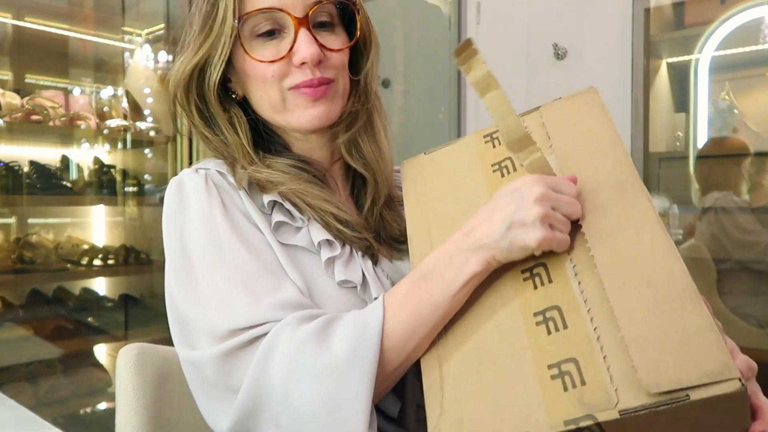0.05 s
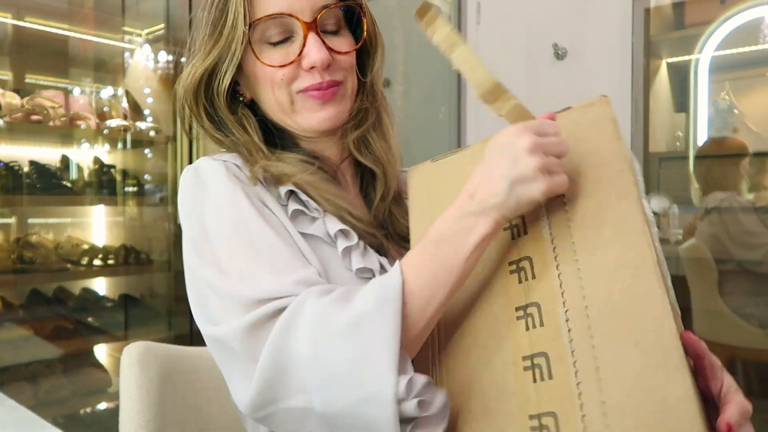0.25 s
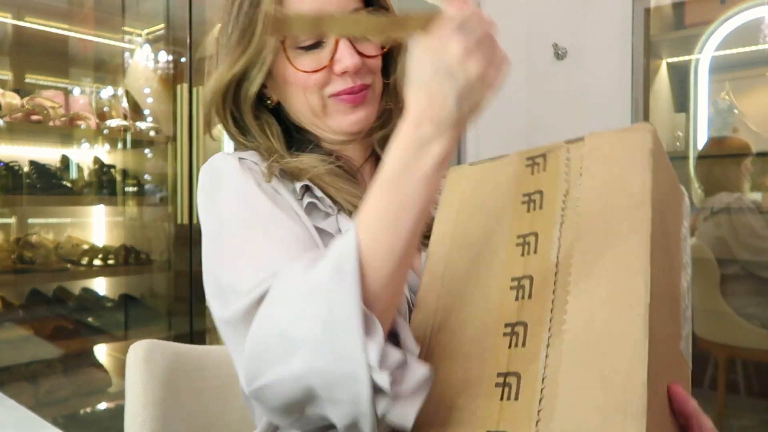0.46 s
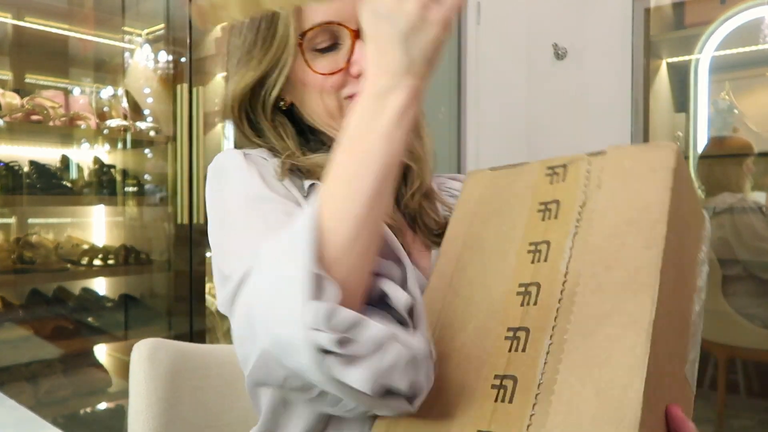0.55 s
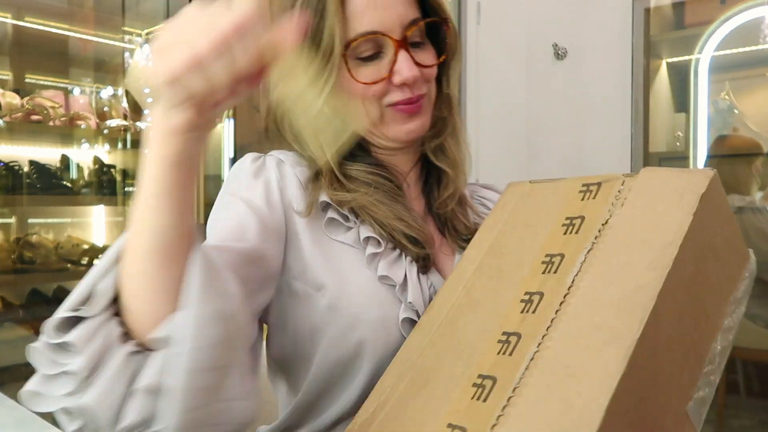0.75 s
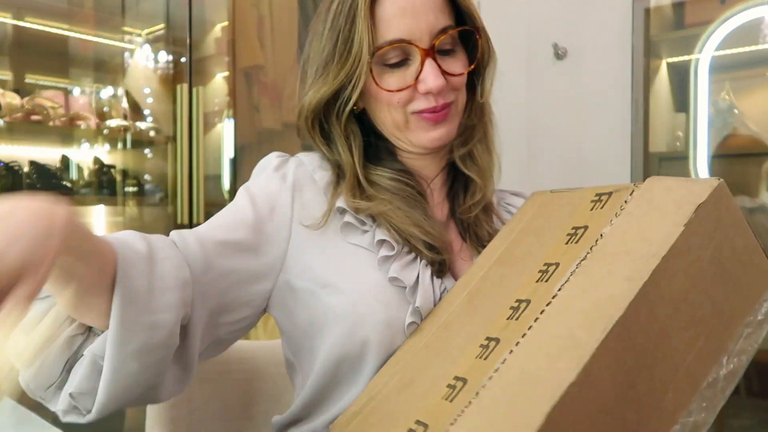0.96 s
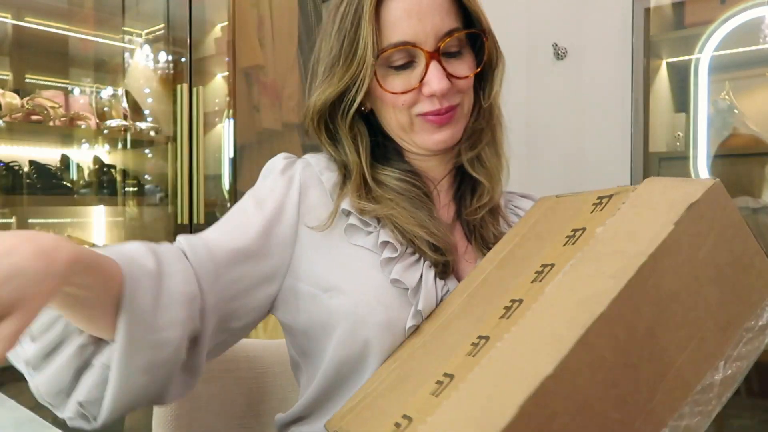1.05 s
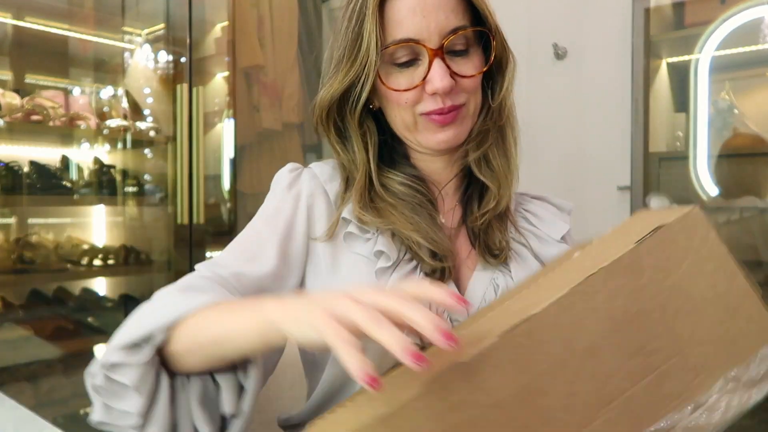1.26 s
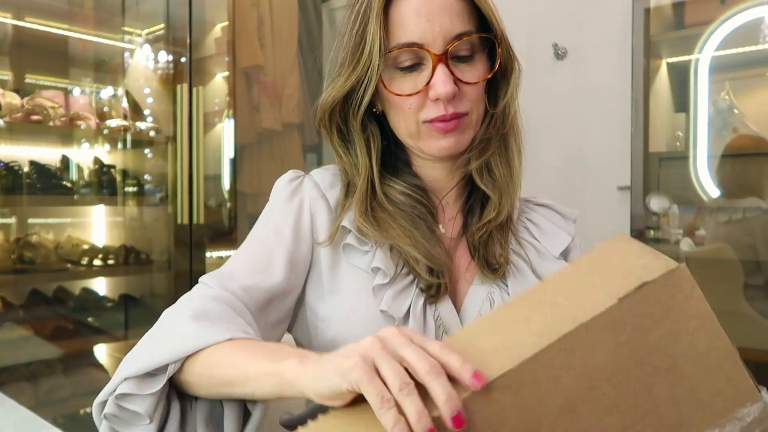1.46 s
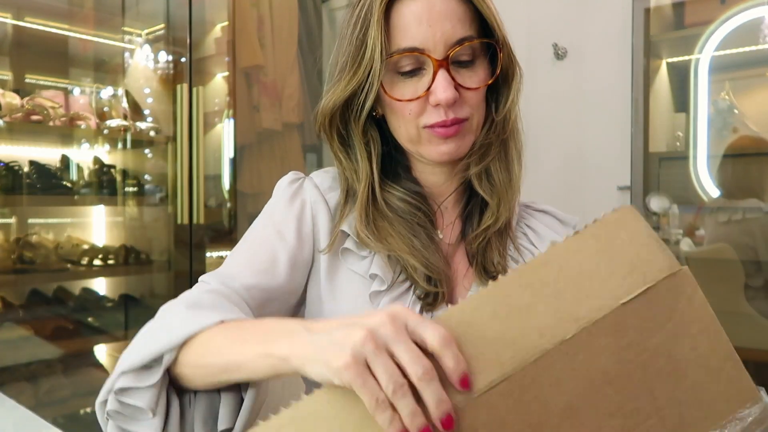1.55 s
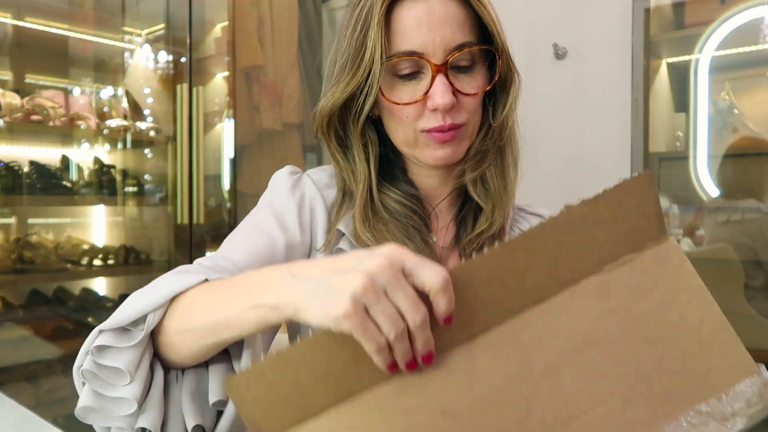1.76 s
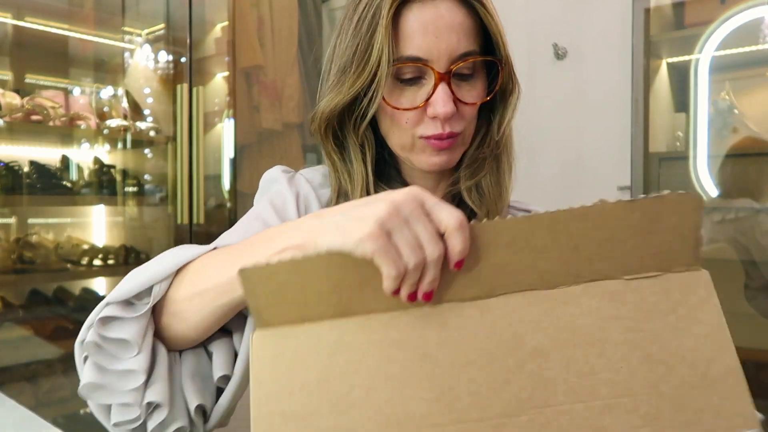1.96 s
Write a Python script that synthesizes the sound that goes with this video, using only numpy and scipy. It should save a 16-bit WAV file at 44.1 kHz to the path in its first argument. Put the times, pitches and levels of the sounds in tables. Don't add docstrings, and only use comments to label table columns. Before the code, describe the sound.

Cardboard tearing, close to a small stereo microphone indoors: a sudden harsh rip in two bursts with hollow box resonance, quick fade, then finger taps, a knock and light creaking pops as the flap is prised up.

```python
import sys
import numpy as np
from scipy import signal
from scipy.fft import rfft, irfft, next_fast_len
from scipy.io import wavfile
from scipy.ndimage import uniform_filter1d

SR = 44100
rng = np.random.default_rng(int(sys.argv[2]) if len(sys.argv) > 2 else 0)


def waveform_to_disk(signal):
    frames = np.transpose(np.atleast_2d(signal))
    scaled = np.clip(frames, -1, 1) * 32767
    samples = np.round(scaled).astype(np.int16)
    wavfile.write(sys.argv[1], SR, samples)


def convert_level_to_amplitude(level_db):
    exponent = np.asarray(level_db, float) / 20
    return 10 ** exponent


N = 88200

# time in seconds, force in dB, box drive in dB, brightness in dB per octave.
STRIP_PULL = [
    [(0, -49.5, 1.5, 3.5), (.143, -62.5, -8, 9), (.150, -55, 5, 8), (.195, -54, 4, 8.5),
     (.224, -38.5, -2, 6), (.2365, -35, -8, 4)],
    [(.2385, -21, 0, 2), (.25, -22.5, -5.5, 6.5), (.275, -22.5, -3.5, 4.5), (.315, -26.5, 2, 2.5),
     (.37, -35, -4, 1.5), (.395, -25, -6, -2.5), (.42, -30, -2, 1)],
    [(.432, -21, -1.5, -4.5), (.451, -33, 0, 0.5), (.482, -28.5, 1.5, 0.5), (.53, -37, -5, -13.5),
     (.6, -53, -5, -16), (.76, -58.5, -16, 4.5)],
]
# time in seconds, force in dB, box drive in dB, brightness in dB per octave.
LID_PULL = [
    [(1.06, -64, -5, 4), (1.095, -51, -5, -1.5), (1.13, -53.5, -3, 2.5), (1.161, -53, 0, 0),
     (1.166, -37, -6, 3), (1.21, -40.5, -4.5, 3.5), (1.266, -46, -2.5, 2.5), (1.34, -42, -10, 4.5),
     (1.395, -36, -7, 3.5)],
    [(1.45, -39, 0.5, 0.5), (1.522, -43, -0.5, 4), (1.579, -40, 0, 1), (1.584, -33, -2, -2),
     (1.635, -33.5, -8, -3.5), (1.682, -36, -3, 4.5)],
    [(1.693, -29, -1, -3), (1.72, -29.5, -8, 2), (1.745, -37, -12, 0), (1.81, -42.5, -4.5, 3.5),
     (1.835, -38, 2.5, -3), (1.88, -41, -1, 6.5), (1.95, -36.5, -1.5, 1.5), (2.0, -33.5, -5, 0)],
]
# time in seconds, peak level in dB, length in seconds, low pitch
# in Hz (also the slips per second, up to a limit), level of the crisp part in dB.
GLUE_SNAPS = [(.2378, -9, .002, 450, -4), (.4228, -5, .0055, 590, -14), (1.1622, -21, .004, 1750, 2),
              (.151, -36, .008, 1300, 0), (.2665, -9, .004, 1000, -2), (.278, -12, .003, 600, -3),
              (.483, -17, .004, 1100, 0), (1.178, -25, .004, 380, -10), (1.445, -25, .005, 800, -12),
              (1.582, -21, .012, 540, -6), (1.831, -28, .008, 380, -14), (1.689, -30, .009, 1600, 0),
              (1.703, -21, .002, 900, 0), (1.96, -26, .008, 300, -14)]
# time in seconds, peak level in dB, length in
# seconds, pitch in Hz, width in Hz.
SHORT_BURSTS = [(.2478, -10, .006, 2850, 600), (.2545, -8, .005, 3000, 350), (.2615, -9, .005, 3200, 450),
                (.2675, -9, .0025, 3000, 450), (.2712, -9, .003, 3000, 450), (.2775, -12, .007, 3050, 350),
                (.287, -15, .005, 3050, 400), (.3075, -12, .008, 2950, 500), (.4218, -9, .0025, 2800, 500),
                (.4228, -9, .005, 1250, 250), (.4228, -11, .004, 1850, 300), (.4265, -12, .0025, 3050, 600),
                (.4245, -16, .003, 3900, 900), (.46, -22, .008, 2800, 900), (1.1622, -22, .005, 2050, 500),
                (1.1775, -26, .007, 380, 200), (1.188, -29, .006, 330, 200), (1.636, -26, .005, 2100, 900),
                (1.685, -19, .01, 1600, 500), (1.6865, -19, .013, 3200, 800), (1.693, -17, .005, 2600, 800),
                (1.715, -22, .007, 2800, 1200), (.2405, -11, .005, 300, 200), (.296, -17, .008, 3050, 400),
                (1.698, -21, .006, 3400, 1200), (1.209, -30, .005, 2200, 500), (1.17, -29, .014, 3200, 700),
                (1.19, -30, .011, 3100, 800), (1.172, -30, .012, 2000, 400), (1.705, -23, .012, 3300, 1200),
                (.43, -20, .02, 200, 80)]
# start in seconds, length in seconds, level in dB.
FIBRE_FIZZ = [(.55, 0.71, -76.5), (1.5, .13, -67), (0.141, 0.1, -60.5), (.232, .035, -41),
              (1.645, 0.06, -63.5), (1.675, 0.051, -51.5)]
# time in seconds, level in dB, tilt in dB per octave, ring time factor.
BOX_BLOWS = [(.2375, -15, -3, .9), (1.4015, -16.5, 4, .6), (1.4112, -20, 4, .9), (.262, -22, -3, 1.1),
             (.425, -25, 4, .9), (1.945, -34, 3, .6)]
# start in seconds, rubbing time in seconds, pitch in Hz,
# level in dB, time to die by 60 dB in seconds.
RUBBED_PANELS = [(.255, 0.058, 592, -22.5, 0.2), (.24, 0.085, 1030, -26, 0.058),
                 (.28, 0.052, 1482, -25, 0.081), (.244, 0.071, 2940, -27, 0.0089),
                 (.264, .012, 1850, -19, 0.027), (.43, 0.05, 600, -34, .06),
                 (.475, 0.093, 1010, -28.5, .035), (.466, 0.035, 1065, -28, 0.057),
                 (.635, 0.039, 1025, -47, 0.046), (.715, 0.059, 1010, -53, .04),
                 (.47, 0.04, 1240, -35.5, 0.22), (.46, 0.15, 186, -35, 0.084),
                 (0.0077, 0.15, 96, -41, 0.093), (1.455, .055, 195, -29, 0.08),
                 (1.62, 0.068, 644, -34, 0.016), (.56, 0.082, 680, -46, .08), (.5, 0.047, 702, -38, 0.083),
                 (0.18, 0.076, 630, -57.5, .06)]
# pitch in Hz, level in dB, time to die by 60 dB in seconds.
BOX_MODES = [(88, -4, .28), (128, -1, .25), (186, -1, .3), (222, -4, .1), (300, -11, .08)]
# frequency in Hz, level in dB per Hz.
CARD_COLOUR = [(120, -23), (200, -17), (544, -18.5), (596, -7.5), (906, -7.5), (992, -9.5), (2900, -11.5),
               (3360, -15), (15500, -42.5)]
# pitch in Hz, width in Hz, level in dB.
CARD_PANELS = [(654, 240, -0.5), (1050, 63, -9), (1480, 260, -7), (1860, 1000, 0.5), (2950, 1100, -4.5),
               (4390, 540, -5)]
# frequency in Hz, level in dB per Hz.
HUM_COLOUR = [(15, -41), (25, -8.5), (140, 2.5), (305, -16), (349, -12), (421, -19.5), (482, -18),
              (10400, -40.5), (15500, -57)]
# frequency in Hz, level in dB per Hz.
HISS_COLOUR = [(35, -45), (60, -20), (156, -0.5), (285, 7), (320, 2), (359, 5), (829, -1), (15500, -22)]
# frequency in Hz, time to die by 60 dB in seconds.
ROOM_DECAY = [(100, 0.33), (500, 0.51), (1500, 0.34), (4000, 0.34), (10000, 0.36)]
# frequency in Hz, level in dB.
PORT_DIFFERENCE = [(60, -50.5), (130, -76), (290, -28), (640, -24.5), (1410, -28.5), (3100, -12),
                   (6820, 1.5), (9000, 3.5), (15000, 2.5)]
# frequency in Hz, share from 0 to 1.
REFLECTED_SHARE = [(300, 1), (1500, 0.45), (3100, 0.5), (6800, 0.97), (12000, 1)]
# frequency in Hz, level in dB.
PORT_SUM = [(8000, -1), (9300, -3), (9900, -8), (15000, -8.5)]

HUM_DB, HISS_DB, WET_DB = -48.5, -59.5, -9.5
FIBRES_PER_S, SPREAD_DB = 16000, 2.2
CLUMP_DB, CLUMP_S = 1.1, .006
GRAIN_LOW_HZ, GRAIN_HIGH_HZ, GRAIN_CYCLES, GRAIN_DB = 250, 9000, 6, 19
CRISP_HZ, CRISP_WIDTH_HZ, LOW_Q = 2900, 1100, 4
SNAP_TOP_HZ, FASTEST_SLIPS_HZ = 4200, 950
PUSH_S, FIZZ_LOW_HZ = .0025, 9800
CEILING = 1.3


def evened(x):
    return x / np.sqrt(np.mean(x ** 2) + 1e-20)


def read(points, hz):
    f, value = np.transpose(points)
    return np.interp(np.log(hz + 1), np.log(f + 1), value)


def shaped(x, gain):
    size = next_fast_len(N + 4096)
    spectrum = rfft(x, size) * gain(np.fft.rfftfreq(size, 1 / SR))
    return irfft(spectrum, size)[..., :N]


def add(mix, s, sound):
    part = mix[round(s * SR):][:len(sound)]
    part += sound[:len(part)]


def resonate(x, hz, width_hz):
    pole = np.exp((2j * hz - width_hz) * np.pi / SR)
    return 2 * signal.lfilter([1 - abs(pole)], [1, -pole], x).real


def ring(hz, db, t60, t):
    return convert_level_to_amplitude(db - 60 * t / t60) * np.sin(2 * np.pi * hz * t)


def room_tone(colour, db):
    noise = rng.standard_normal(N)
    return convert_level_to_amplitude(db) * evened(shaped(noise, lambda hz: convert_level_to_amplitude(read(colour, hz))))


def room(x):
    taps = np.zeros((2, SR))
    at = np.arange(200, SR - 20, 20) + rng.integers(0, 20, (2, (SR - 201) // 20))
    np.put_along_axis(taps, at, rng.choice([-1., 1.], at.shape), 1)
    hz, t, z = signal.stft(taps, SR, nperseg=256)
    fading = convert_level_to_amplitude(-60 * t / read(ROOM_DECAY, hz)[:, None])
    tail = signal.istft(z * fading, SR, nperseg=256)[1]
    return signal.fftconvolve(x[None], tail / np.linalg.norm(tail[0]), axes=1)[:, :N]


def scatter(x):
    taps = rng.standard_normal((4, 1500)) * convert_level_to_amplitude(-60 * np.arange(1500) / SR / 0.023)
    taps = taps / np.linalg.norm(taps[0])
    turn = 2 * np.pi * (np.arange(N) / SR * 23 + np.arange(4)[:, None] / 8)
    echoes = signal.oaconvolve(x * np.cos(turn), taps, axes=1)[:, :N]
    return echoes.sum(0) / np.sqrt(2)


def fizz():
    t = np.arange(N) / SR
    swell = np.zeros(N)
    for s, length, db in FIBRE_FIZZ:
        swell += convert_level_to_amplitude(db) * np.sin(np.pi * np.clip((t - s) / length, 0, 1))
    noise = rng.standard_normal(N)
    return swell * evened(shaped(noise, lambda hz: 1 / (1 + (FIZZ_LOW_HZ / (hz + 1)) ** 12)))


def box():
    out, t = np.zeros(N), np.arange(SR // 2) / SR
    hand = np.hanning(round(PUSH_S * SR))
    hand = hand / hand.sum()
    for s, db, tilt_db, longer in BOX_BLOWS:
        boom = np.zeros(len(t))
        for hz, mode_db, t60 in BOX_MODES:
            tilted_db = tilt_db * np.log2(hz / BOX_MODES[1][0])
            boom += ring(hz, db + mode_db + tilted_db, t60 * longer, t)
        add(out, s, np.convolve(boom, hand))
    out = signal.sosfilt(signal.butter(2, 65, "highpass", fs=SR, output="sos"), out)
    for s, held, hz, db, t60 in RUBBED_PANELS:
        rub = rng.standard_normal(len(t))
        rub = rub * abs(rub) / (1 + (t / held) ** 8)
        panel = resonate(rub, hz, 2.2 / t60)
        loudest = np.sqrt(uniform_filter1d(panel ** 2, 1300).max())
        add(out, s, convert_level_to_amplitude(db) * panel / loudest)
    return out


def snaps():
    out, t = np.zeros(N), np.arange(1500) / SR
    top_cut = signal.butter(2, SNAP_TOP_HZ, fs=SR, output="sos")
    for s, db, length, hz, crisp_db in GLUE_SNAPS:
        wander, rough = rng.standard_normal((2, len(t)))
        speed = min(hz, FASTEST_SLIPS_HZ) * convert_level_to_amplitude(6 * uniform_filter1d(wander, 30))
        turns = np.cumsum(speed) / SR
        slips = np.diff(np.floor(turns), prepend=-1) * convert_level_to_amplitude(1.5 * rough) + .05 * rough
        volley = slips / (1 + (t / length) ** 5)
        volley = signal.sosfilt(top_cut, volley) + convert_level_to_amplitude(-16) * volley
        low = resonate(resonate(volley, hz, hz), hz, hz / LOW_Q)
        low = low + convert_level_to_amplitude(-5) * resonate(volley, 2 * hz, hz / LOW_Q)
        crisp = resonate(volley, CRISP_HZ, CRISP_WIDTH_HZ)
        crisp = resonate(crisp, CRISP_HZ, 3 * CRISP_WIDTH_HZ)
        snap = low / abs(low).max() + convert_level_to_amplitude(crisp_db) * crisp / abs(crisp).max()
        add(out, s, convert_level_to_amplitude(db) * snap)
    return out


def cracks():
    out, t = np.zeros(N), np.arange(900) / SR
    for s, db, length, hz, width_hz in SHORT_BURSTS:
        swell = np.sqrt(np.sin(np.pi * np.clip(t / length, 0, 1)) + 1e-9) * (t < length)
        clump = rng.standard_normal(len(t)) * swell
        clump = resonate(resonate(clump, hz, width_hz), hz, 2 * width_hz)
        add(out, s, convert_level_to_amplitude(db) * clump / abs(clump).max())
    return out


def breaking_fibres():
    luck, size = rng.random(N), rng.exponential(1, N)
    sign, clump = rng.standard_normal((2, N))
    breaks = np.clip((FIBRES_PER_S / SR - luck) * 50, 0, 1)
    clicks = sign * convert_level_to_amplitude(SPREAD_DB * np.minimum(size, 4)) * breaks
    clumps = evened(uniform_filter1d(clump, round(CLUMP_S * SR)))
    clicks = evened(clicks * convert_level_to_amplitude(CLUMP_DB * clumps))
    pitches = np.geomspace(GRAIN_LOW_HZ, GRAIN_HIGH_HZ, num=24)
    which = rng.integers(0, len(pitches), N)
    grains = np.zeros(N)
    for k, hz in enumerate(pitches):
        grains += resonate(clicks * (which == k), hz, hz / GRAIN_CYCLES)
    return clicks + convert_level_to_amplitude(GRAIN_DB) * grains


def tearing():
    t = np.arange(N) / SR
    pause = [(.9, -68, -33, 0.011), (.98, -67, -11, 0)]
    rows = np.vstack([*STRIP_PULL, pause, *LID_PULL])
    rows = rows[np.argsort(rows[:, 0])]
    force, drive, tilt = (np.interp(t, rows[:, 0], column) for column in rows.T[1:])

    def card_gain(hz):
        bass_cut_db = 12 * np.maximum(np.log2(200 / (hz + 1)), 0)
        return convert_level_to_amplitude(read(CARD_COLOUR, hz) - bass_cut_db)

    card = shaped(breaking_fibres(), card_gain)
    card = evened(card + sum(convert_level_to_amplitude(db) * resonate(card, hz, width_hz) for hz, width_hz, db in CARD_PANELS))
    low = shaped(card, lambda hz: 1 / (1 + (hz / 900 + 1e-9) ** 2))
    high = shaped(card, lambda hz: 1 / (1 + (hz / 3800 + 1e-9) ** -2))
    card = card + (convert_level_to_amplitude(-tilt) - 1) * low + (convert_level_to_amplitude(2 * tilt) - 1) * high

    push = rng.standard_normal(N) * convert_level_to_amplitude(force + drive)
    hum = np.zeros(N)
    for hz, db, t60 in BOX_MODES:
        mode_db = db + 18.0 + 2.55 * np.log2(hz / BOX_MODES[1][0])
        hum += convert_level_to_amplitude(mode_db) * resonate(push, hz, 12 / t60)
    return convert_level_to_amplitude(force) * card + hum


def scene():
    near = tearing() + snaps() + box() + cracks()
    far = convert_level_to_amplitude(WET_DB) * room(near)
    front = near + far[0]
    loose = scatter(near) + convert_level_to_amplitude(-1) * far[1]

    def share(hz):
        return np.clip(read(REFLECTED_SHARE, hz), 0, 1)

    def direct_gain(hz):
        return convert_level_to_amplitude(read(PORT_DIFFERENCE, hz)) * np.sqrt(1 - share(hz)) * np.exp(-1.9j)

    def loose_gain(hz):
        return convert_level_to_amplitude(read(PORT_DIFFERENCE, hz)) * np.sqrt(share(hz))

    side = shaped(front, direct_gain) + shaped(loose, loose_gain)
    side = side + room_tone(HISS_COLOUR, HISS_DB)
    front = front + room_tone(HUM_COLOUR, HUM_DB)
    front = shaped(front, lambda hz: convert_level_to_amplitude(read(PORT_SUM, hz))) + fizz()
    return np.array([front + side, front - side])


def roll_off(x):
    return signal.sosfilt(signal.butter(12, 15710, fs=SR, output="sos"), x)


def record(dry):
    x = signal.sosfilt(signal.butter(3, 48, "highpass", fs=SR, output="sos"), dry)
    x = shaped(x, lambda hz: 1 / (1 + (hz / 15600) ** 120))
    return roll_off(CEILING * np.tanh(x / CEILING))


dry = scene()
out = record(dry)
waveform_to_disk(out)
```